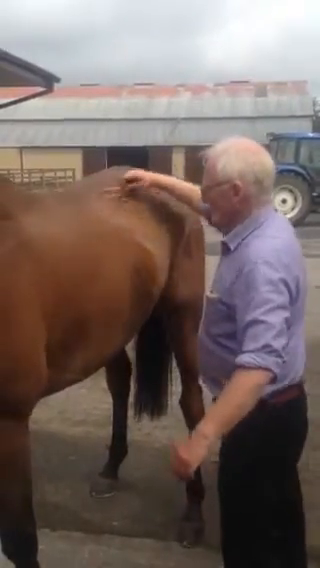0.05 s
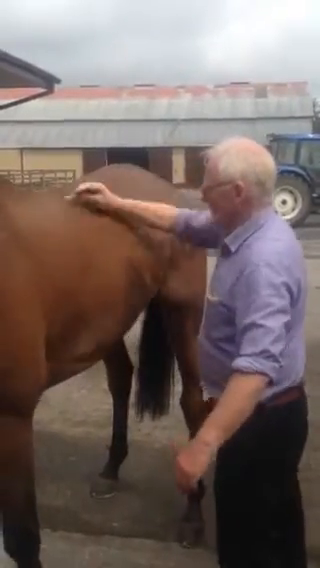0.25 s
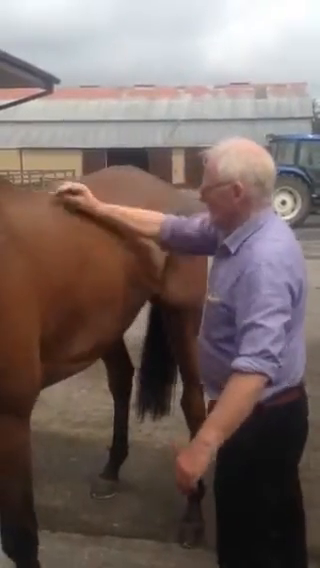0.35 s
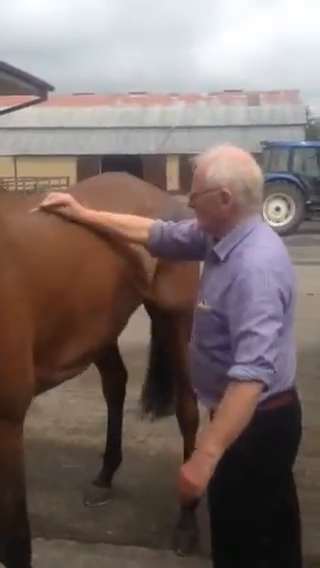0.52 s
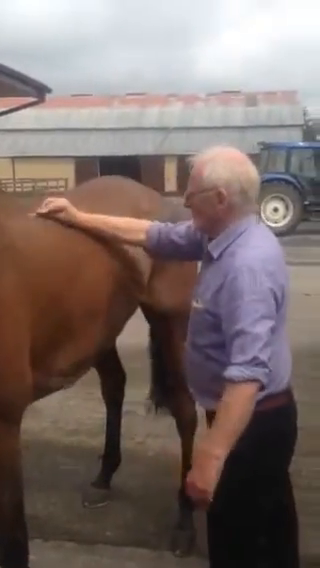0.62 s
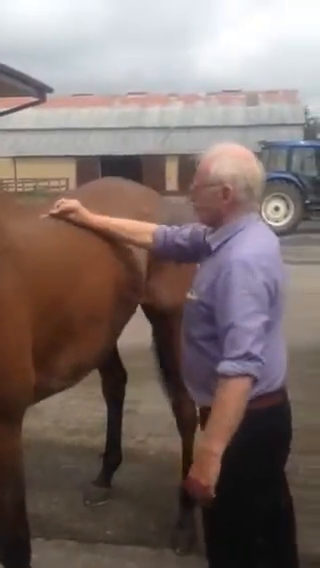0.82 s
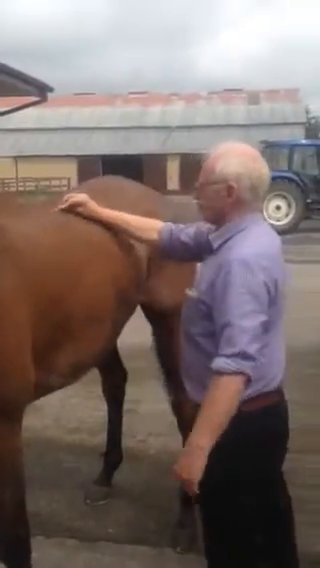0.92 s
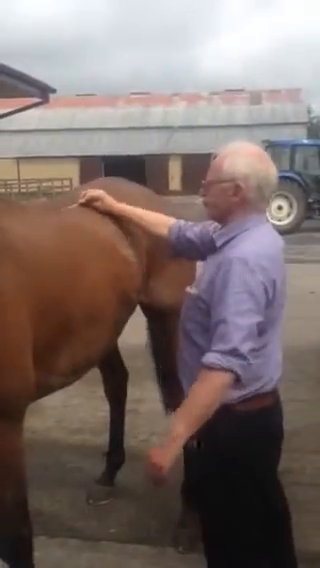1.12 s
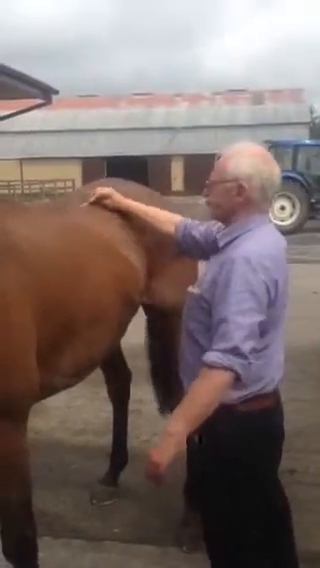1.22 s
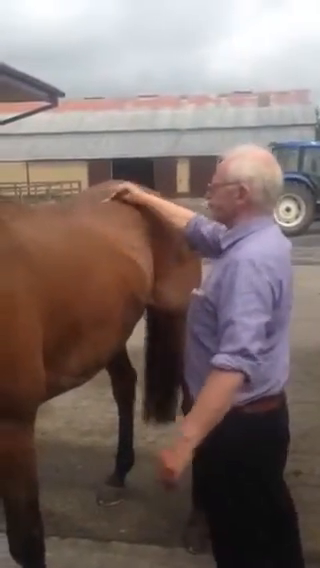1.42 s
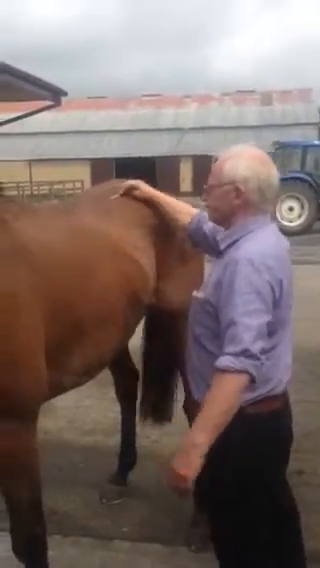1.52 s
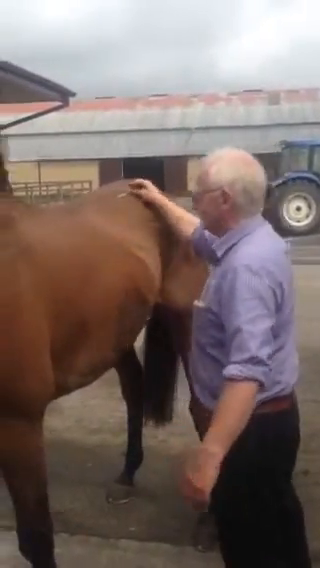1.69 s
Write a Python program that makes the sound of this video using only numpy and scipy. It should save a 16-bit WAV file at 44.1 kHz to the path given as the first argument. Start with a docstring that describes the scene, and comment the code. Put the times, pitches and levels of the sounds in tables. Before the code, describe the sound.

A horse snorts close by in an open yard. A thin puff at about 0.15 seconds leads into a loud blast of air, nostrils flapping with low thuds and a pulsing hiss, fading by 0.6 seconds. From about 0.85 to 1.7 seconds the horse draws a much softer breath that rattles at first and thins to a hiss. There is a faint echo and a quiet low hum throughout.

```python
"""A horse snorts close by in an open yard: after a thin puff, a blast of air sets its nostrils
flapping, with low thuds under a pulsing rush and hiss. It then draws a long soft breath that
rattles at first and thins to a hiss. The sheds give a faint echo over a low background hum."""
import sys
import numpy as np
from scipy import signal
from scipy.fft import rfft, irfft
from scipy.io import wavfile
from scipy.ndimage import uniform_filter1d

SR = 44100
rng = np.random.default_rng(int(sys.argv[2]) if len(sys.argv) > 2 else 0)


def digitize_waveform(pressure):
    """Quantize a signal to 16-bit integers and store it at the path in sys.argv[1].

    Rows of a 2-D input are taken as channels; values are limited to [-1, 1].
    """
    field = np.atleast_2d(pressure).T
    bounded = np.clip(field, -1, 1)
    quanta = np.round(bounded * 32767).astype(np.int16)
    wavfile.write(sys.argv[1], SR, quanta)


N = 77175
TIME = np.arange(N) / SR


def from_db(db):
    return 10 ** (np.asarray(db) / 20)


def unit_rms(x):
    return x / np.sqrt(np.mean(x ** 2) + 1e-20)


def lowpass(x, hz, order):
    return signal.sosfilt(signal.butter(order, hz, fs=SR, output="sos"), x)


def curves(rows):
    """Per-sample curve for each column after t/s."""
    times_s, *columns = np.transpose(rows)
    return [np.interp(TIME, times_s, column) for column in columns]


def gains(rows, fade_db_per_s=500):
    """Level curves as gains, fading outside their span."""
    outside_s = np.maximum(rows[0][0] - TIME, 0) + np.maximum(TIME - rows[-1][0], 0)
    return [from_db(db - fade_db_per_s * outside_s) for db in curves(rows)]


def noise(spectrum):
    """Coloured noise, unit RMS."""
    hz, db = np.transpose(spectrum)
    bins_hz = np.maximum(np.fft.rfftfreq(N, 1 / SR), 1)
    colour = from_db(np.interp(np.log(bins_hz), np.log(hz), db))
    return unit_rms(irfft(rfft(rng.standard_normal(N)) * colour, N))


def steady(x, window_s=0.028):
    """Even out slow chance swells."""
    return x / np.sqrt(uniform_filter1d(x * x, int(window_s * SR)) + 1e-6)


def resonate(x, modes):
    """Parallel resonances of alternating sign, unit RMS."""
    total = 0
    for k, (hz, width_hz, db) in enumerate(modes):
        r = np.exp(-np.pi * width_hz / SR)
        ring = signal.lfilter([1, 0, -1], [1, -2 * r * np.cos(2 * np.pi * hz / SR), r * r], x)
        total = total + (-1) ** k * from_db(db) * (1 - r * r) * ring
    return unit_rms(total)


def glide(pitch, flow, half_width_hz):
    """Uneven airflow sounding one moving resonance."""
    white = rng.standard_normal((2, N)) * flow
    baseband = lowpass(white[0] + 1j * white[1], half_width_hz, order=2)
    carrier = np.exp(2j * np.pi * np.cumsum(curves(pitch)[0]) / SR)
    return steady(unit_rms(np.real(baseband * carrier)))


def air_note(rows, flow, half_width_hz):
    """Breathy note following its own pitch and level."""
    envelope = gains([(s, db) for s, hz, db in rows])[0]
    return envelope * glide(rows, flow, half_width_hz)


def pulses(rate_hz, jitter, decay_s, spread_db):
    """Uneven train of sharp, decaying pulses, unit RMS."""
    timing, strength = rng.uniform(-1, 1, (400, 2)).T
    cycles = np.cumsum(rate_hz * np.ones(N)) / SR
    onsets = np.searchsorted(cycles, np.cumsum(np.exp(2 * jitter * timing)))
    inside = onsets < N
    clicks = np.zeros(N)
    clicks[onsets[inside]] = from_db(spread_db * strength[inside])
    return unit_rms(signal.lfilter([1], [1, -np.exp(-1 / (decay_s * SR))], clicks))


def flutter(rows, open_s):
    """Nostril opening, -1 to 1, with a crest at open_s."""
    rate_hz, depth = curves(rows)
    cycles = np.cumsum(rate_hz) / SR
    return depth * np.cos(2 * np.pi * (cycles - np.interp(open_s, TIME, cycles)))


def hum():
    """Steady low background noise."""
    # spectrum: f/Hz, level/dB
    spectrum = [(25, -8), (60, 5), (120, 4), (200, -2), (290, -4), (560, -3), (850, -10.5), (2000, -17),
                (5000, -20), (10000, -24), (15000, -26)]
    return from_db(-59.5) * noise(spectrum)


def shed_echo(x, t60_s=0.72, build_s=0.01):
    """Weak, dull echo scattered from the sheds."""
    # tail spectrum: f/Hz, level/dB
    spectrum = [(40, -8), (130, 1), (300, -0.5), (900, 4), (2500, 4), (5000, -3), (9000, -10.5),
                (15000, -17)]
    tail = noise(spectrum) * from_db(-60 * TIME / t60_s) * (1 - np.exp(-TIME / build_s))
    return from_db(-22.5) * signal.fftconvolve(x, tail / np.sqrt(np.sum(tail ** 2)))[:N]


def near_reflections(x):
    """Surfaces by the horse's head add a hollow colour."""
    # reflections: delay/s, gain
    taps = [(.00135, 0.16), (.0038, 0.11), (.0051, 0.2), (.00575, .08)]
    return x + sum(gain * np.pad(x, (int(delay_s * SR), 0))[:N] for delay_s, gain in taps)


def breath(drone_swing_db=3.5, hiss_swing_db=2.5):
    """Air drawn through the nose: quivering drone, soft rattle, hollow hiss, two breathy notes."""
    # envelopes: t/s, drone/dB, rattle/dB, hiss/dB
    levels = [(0.852,-65,-67,-56), (0.862,-44,-41.5,-60), (0.88,-56,-49.5,-46.5), (0.92,-42,-41,-45.5),
              (1.06,-41.5,-42,-45), (1.17,-39,-42.5,-47.5), (1.205,-44,-47.5,-51), (1.26,-47,-60,-48),
              (1.295,-37,-54.5,-47), (1.39,-45.5,-56,-47), (1.47,-45,-55,-49), (1.59,-52.5,-58.5,-54),
              (1.65,-55,-51,-53), (1.71,-72.5,-77,-75)]
    # nostril quiver: t/s, rate/Hz, depth
    quiver_rate = [(0.9, 37, .6), (1.2, 40, .5), (1.3, 37, .9), (1.38, 34, 1), (1.47, 28, 1),
                   (1.57, 30, .3)]
    drone_gain, rattle_gain, hiss_gain = gains(levels)
    ticks = pulses(rate_hz=70, jitter=0.2, decay_s=0.0033, spread_db=-1.5)
    quiver = flutter(quiver_rate, open_s=1.34)
    rattle_in_hiss = 0.63 * ticks * rattle_gain / rattle_gain.max()
    flow = (1 + rattle_in_hiss) * from_db(hiss_swing_db * quiver)
    white = rng.standard_normal((2, N))

    # nasal drone: t/s, f/Hz
    drone_pitch = [(0.9, 165), (1.0, 192.2), (1.1, 202.5), (1.17, 171.3), (1.23, 199.9), (1.31, 207.4),
                   (1.39, 205.7), (1.46, 228.3), (1.65, 215.2)]
    # noise around the drone: f/Hz, level/dB
    skirt = [(30, -15), (90, -14), (160, -5.5), (260, 1.5), (380, -2), (600, -8.5), (1500, -37)]
    drone = from_db(-1.5) * glide(drone_pitch, flow=1, half_width_hz=26.7) + from_db(-7) * noise(skirt)
    drone *= from_db(drone_swing_db * quiver)

    # throat and airway resonances: f/Hz, width/Hz, level/dB
    throat = [(512, 100, 1), (626, 104, -0.5), (750, 198, -0.5), (997, 196, -4), (1567, 220, -14)]
    airway = [(2360, 250, 6), (2980, 115, 3.5), (3260, 210, 0), (3610, 370, 1), (4350, 350, 0),
              (5100, 88, -2), (6050, 150, -12.5), (7500, 160, -15), (8100, 200, -10), (8970, 200, -18),
              (12700, 2000, -16.5)]
    # broad hiss: f/Hz, level/dB
    air_spectrum = [(300, -34), (1000, 0.5), (1700, 6), (3000, 3.5), (5000, 0.5), (7000, -5.5),
                    (10000, -9.5), (15000, -23)]
    rattle = from_db(-2) * steady(resonate(white[0] * (1 + ticks), throat))
    hiss = from_db(-3.5) * steady(resonate(white[1] * flow, airway))
    hiss += from_db(-6) * steady(flow * noise(air_spectrum))

    # sinking whistle, late rising wheeze: t/s, f/Hz, level/dB
    whistle = [(0.858, 3330, -61), (0.866, 3330, -49.5), (0.95, 3280, -51.5), (1.06, 3080, -51),
               (1.17, 2950, -51), (1.21, 2900, -56), (1.26, 2950, -53), (1.41, 2930, -54),
               (1.47, 2920, -79), (1.6, 2950, -83), (1.65, 3000, -57.5)]
    wheeze = [(1.24, 4200, -70), (1.35, 4270, -52.5), (1.46, 4430, -64), (1.52, 4830, -53.5),
              (1.6, 5007, -63)]
    notes = air_note(whistle, flow, half_width_hz=170) + air_note(wheeze, flow, half_width_hz=310)
    return drone_gain * drone + rattle_gain * rattle + hiss_gain * hiss + notes


def lead_puff(turbulence):
    """Thin puff through half-closed nostrils ahead of the blast."""
    # envelope: t/s, level/dB
    levels = [(0.13, -66), (0.157, -49.5), (0.166, -38.5), (0.19, -39.5), (0.198, -24.5), (0.232, -19),
              (0.25, -54)]
    # nostril resonances: f/Hz, width/Hz, level/dB
    narrow_nostrils = [(970, 340, -3.5), (1730, 380, -2), (2270, 300, -2), (2570, 130, -0.5),
                       (3430, 520, -9)]
    puff = lowpass(resonate(turbulence, narrow_nostrils), hz=4600, order=2)
    return gains(levels)[0] * steady(puff)


def nose_thuds(slaps):
    """Slaps strike the nose's resonances, over a rumble and a low note that sinks with the pressure."""
    # nose resonances: f/Hz, width/Hz, level/dB
    nose = [(75, 16, -13.5), (100.8, 24, -5), (144.2, 29, 0), (212.6, 41, 1.5)]
    # rumble: f/Hz, level/dB
    spectrum = [(25, -34), (50, -22), (75, -9), (130, -0.5), (200, -3), (280, -7.5), (400, -10.5),
                (900, -44)]
    # low note: t/s, f/Hz
    pitch = [(0.23, 172), (0.34, 160.9), (0.44, 149.8), (0.52, 134.4), (0.6, 117.3)]
    knocks = steady(lowpass(resonate(slaps, nose), hz=245, order=4))
    rumble = steady(noise(spectrum))
    note = glide(pitch, slaps, half_width_hz=20)
    return from_db(-6) * knocks + from_db(-7.5) * rumble + from_db(-3.5) * note


def snort(first_flap_s=0.235, thud_swing_db=2.5, rush_swing_db=4, hiss_swing_db=3):
    """The nostrils flap and their wet rims slap, thudding and chopping the escaping air."""
    # envelopes: t/s, thuds/dB, rush/dB, hiss/dB
    levels = [(0.16,-69,-53,-78), (0.178,-38.5,-45,-57), (0.198,-52,-35.5,-48), (0.218,-38,-26,-44),
              (0.232,-18,-18,-40), (0.268,-20.5,-21,-28.5), (0.284,-18,-18.5,-20), (0.345,-17,-21,-22),
              (0.378,-21.5,-25.5,-27.5), (0.408,-20.5,-22,-25), (0.445,-21.5,-25,-27.5),
              (0.5,-25.5,-27,-30.5), (0.556,-31.5,-29,-38), (0.592,-30.5,-38,-44), (0.614,-51,-45,-52),
              (0.66,-46,-61,-67)]
    # nostril flaps: t/s, rate/Hz, depth
    flap_rate = [(0.236, 40, .8), (0.31, 40, .55), (0.345, 27, 1), (0.42, 29.5, 1), (0.49, 30, .85),
                 (0.58, 28, .3)]
    # rim slaps, slowing as the blast runs out: t/s, rate/Hz
    slap_rate = [(0.23, 100.4), (0.36, 103.8), (0.45, 76), (0.6, 78.6)]
    thud_gain, rush_gain, hiss_gain = gains(levels)
    quarter_flap_s = 1 / (4 * flap_rate[0][1])
    opening = flutter(flap_rate, first_flap_s) * (TIME > first_flap_s - quarter_flap_s)
    slaps = pulses(curves(slap_rate)[0], jitter=0.13, decay_s=0.0045, spread_db=0.5)
    chop = unit_rms(1 + 0.56 * slaps)
    white = rng.standard_normal((2, N))
    thuds = thud_gain * from_db(thud_swing_db * opening) * nose_thuds(slaps)

    # escaping air: f/Hz, level/dB
    rush_spectrum = [(100, 16), (300, -14.5), (450, 3.5), (700, 3), (1000, 2), (1500, 0), (2500, -2),
                     (3300, -18), (5000, -29.5), (9000, -54), (15000, -51.5)]
    hiss_spectrum = [(800, -23), (2200, -14.5), (3300, 2.5), (4300, 2), (5800, -1.5), (7800, -5),
                     (9600, -16), (13000, -13), (15500, -21)]
    # nostril resonances: f/Hz, width/Hz, level/dB
    open_nostrils = [(1187, 194, 8), (1530, 69, -2), (1944, 48, 5.5), (2504, 220, 4.5), (3150, 100, 9),
                     (3360, 77, 3.5), (4160, 270, 2.5), (4990, 210, -10.5)]
    ring = from_db(-4) * steady(resonate(chop * white[0], open_nostrils))
    rush = rush_gain * steady(chop * noise(rush_spectrum)) + np.sqrt(rush_gain * hiss_gain) * ring
    rush *= from_db(1.5 + rush_swing_db * opening)
    hiss = hiss_gain * steady(chop * noise(hiss_spectrum))
    hiss *= from_db(-0.5 + hiss_swing_db * opening)

    # hollow nose note ending the blast: t/s, f/Hz, level/dB
    hollow = [(0.44, 1000, -39), (0.5, 1000, -28.5), (0.545, 976.4, -32), (0.585, 775, -32),
              (0.61, 782, -43.5)]
    return lead_puff(white[1]) + thuds + rush + hiss + air_note(hollow, slaps, half_width_hz=180)


def scene():
    """Horse, echo and hum; mono."""
    horse = snort() + near_reflections(breath())
    return (horse + shed_echo(horse) + hum())[None]


def record(dry, low_cut_hz=62, high_cut_hz=15330):
    """The microphone loses the deepest bass; the top is cut steeply."""
    thinned = signal.sosfilt(signal.butter(3, low_cut_hz, "high", fs=SR, output="sos"), dry)
    return signal.sosfilt(signal.ellip(12, .1, 80, high_cut_hz, fs=SR, output="sos"), thinned)


dry = scene()
out = record(dry)
digitize_waveform(out)
```